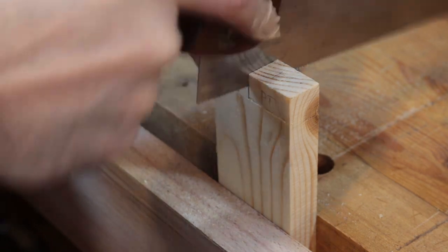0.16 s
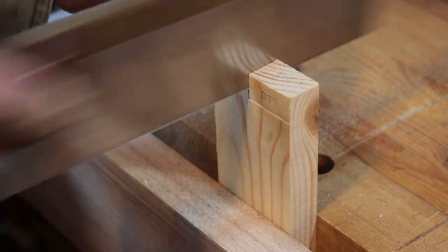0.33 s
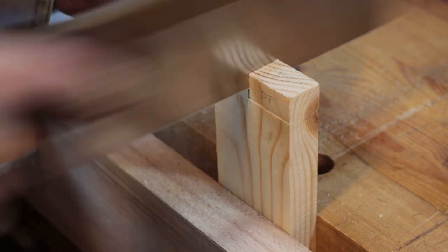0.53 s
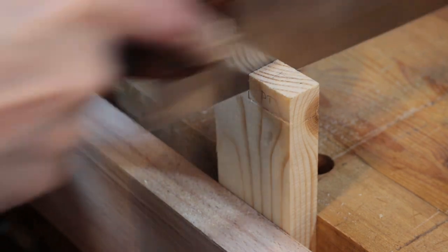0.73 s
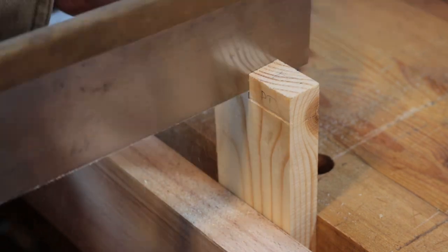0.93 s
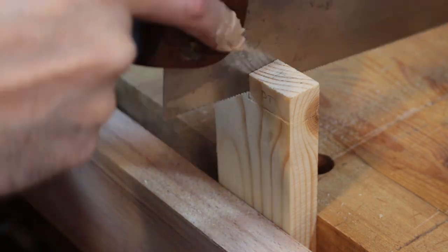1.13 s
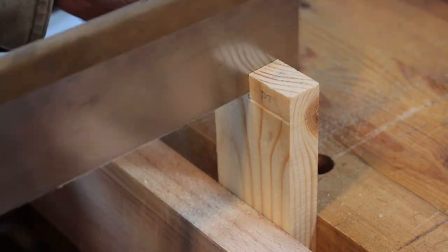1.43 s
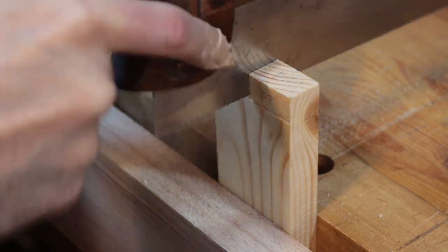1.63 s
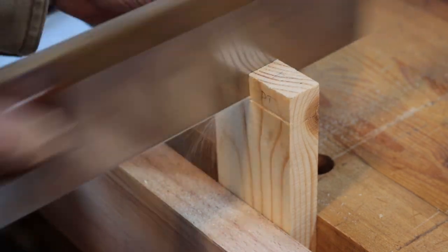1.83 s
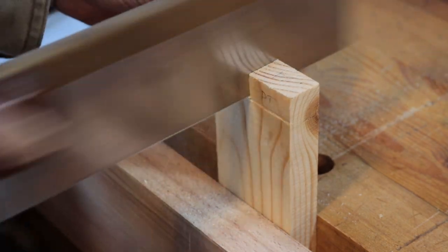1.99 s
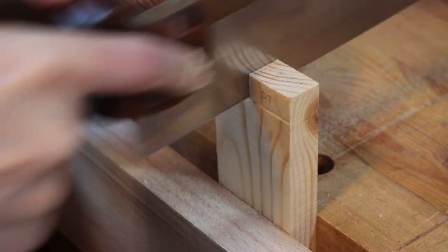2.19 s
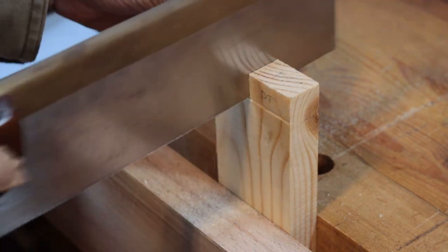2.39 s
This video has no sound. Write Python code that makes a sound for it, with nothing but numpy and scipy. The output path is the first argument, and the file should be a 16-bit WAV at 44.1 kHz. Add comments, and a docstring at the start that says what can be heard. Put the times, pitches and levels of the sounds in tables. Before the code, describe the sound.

Brisk wood sawing, hard honking push strokes alternating with softer scratchy pulls, close in a small workshop.

```python
"""A close stereo pair in a small workshop: a backsaw in a pine board held in a bench vise, two and a half seconds.
Over quiet room air a dragging pull is under way; a push bites hard, and the two alternate, about four strokes a second.
From the start the teeth knock the board in a half-regular train, fibres tear, grit rasps through the steel blade,
short notes of locked teeth come and go, and the bench rumbles and thuds. From a third of a second in, teeth also snag
now and then with blunt knocks. The room answers throughout, and a last push is biting at the end."""
import sys
import numpy as np
from scipy import signal
from scipy.fft import rfft, irfft, next_fast_len
from scipy.io import wavfile
from scipy.ndimage import uniform_filter1d, map_coordinates

SR = 44100
rng = np.random.default_rng(int(sys.argv[2]) if len(sys.argv) > 2 else 0)


def level_to_linear(level):
    """Convert decibel levels to linear amplitude factors, elementwise."""
    exponent = np.asarray(level, float) / 20
    return 10 ** exponent


def wrap_up_sound(samples):
    """Save the sound to the file named by the first command line argument, as 16-bit audio."""
    columns = np.atleast_2d(samples).T
    # keep every value between -1 and 1, then stretch to whole-number steps
    tamed = np.clip(columns, -1, 1)
    steps = np.round(tamed * 32767).astype(np.int16)
    wavfile.write(sys.argv[1], SR, steps)


N = 112454  # samples, about 2.55 s

# resonances of the board in the vise: (frequency [Hz], width [Hz], relative level [dB])
BOARD_MODES = [(201, 35, -11), (270, 23, -2), (314.6, 26.4, -3.5), (437, 32.6, -1.5), (472.6, 41, -4),
               (548.3, 47.4, -3.5), (696.5, 40, -12.5), (774.6, 105, -5.5), (821.7, 50.5, -1.5),
               (888, 35, 2.5), (935, 31.3, -1), (1007, 50, -6.5), (1067.6, 38.5, -5.5), (1134, 40, -10.5),
               (1212, 30, -8.5), (1386, 215, -17.5), (740, 324, -12.5)]
PATCHY_DB = 2  # rms depth of the drifting patches in tearing and grit


def unit(x):
    """Scaled to rms 1."""
    return x / np.sqrt(np.mean(x ** 2) + 1e-20)


def along(points, hz):
    """(Hz, value) points read on a log frequency axis."""
    f, v = np.transpose(points)
    return np.interp(np.log(hz + 1), np.log(f + 1), v)


def filtered(x, response):
    """x times a complex response of frequency."""
    size = next_fast_len(N + SR // 2)  # spare half second for the ringing
    spectrum = rfft(x, size) * response(np.fft.rfftfreq(size, 1 / SR))
    return irfft(spectrum, size)[..., :N]


def modes(table, sign=-1):
    """Causal response of a set of resonances; sign 1 starts them all in step, -1 in alternation."""
    def response(f):
        return sum(sign ** k * level_to_linear(db) * 1j * f * width / (centre * centre - f * f + 1j * f * width)
                   for k, (centre, width, db) in enumerate(table))
    return response


def wobble(rate):
    """A smooth random curve, rate knots a second."""
    knots = rng.standard_normal(size=400)
    return map_coordinates(knots, [np.arange(N) * rate / SR], mode="mirror")


def grains(per_s, spread_db):
    """Random impulses of uneven size, rms 1."""
    chance, size, sign = rng.random(N), rng.exponential(size=N), rng.standard_normal(N)
    return unit((chance < per_s / SR) * level_to_linear(spread_db * size) * sign)


def patchy(x, depth_db):
    """x with drifting patches of random gain over time and frequency, rms 1."""
    z = signal.stft(x, nperseg=512)[2]
    field = uniform_filter1d(rng.standard_normal(z.shape), 4, 0)
    field = uniform_filter1d(field, 6, 1)
    return unit(signal.istft(z * level_to_linear(depth_db * unit(field)), nperseg=512)[1][:N])


def spread(pair):
    """Two unrelated signals as mid and side: near mono in the bass, wide in the treble."""
    # width of the room sound: (frequency [Hz], side over mid [dB])
    room_width = [(25, -19), (60, -22), (250, -15.5), (700, -6.5), (3000, -1), (6000, 2.5), (15000, 0)]
    side = filtered(pair[1], lambda f: level_to_linear(along(room_width, f)))
    return np.array([pair[0] + side, pair[0] - side])


def air():
    """The quiet of the workshop: steady coloured noise, spread over the two ports."""
    # colour of the air noise: (frequency [Hz], relative level [dB])
    air_colour = [(12, -51), (20, -16), (118, -21), (286, 0), (733, -3), (865, -15), (1460, -33),
                  (4200, -18), (15000, -73)]
    noise = filtered(rng.standard_normal((2, N)), lambda f: level_to_linear(along(air_colour, f)))
    return level_to_linear(-51) * spread(unit(noise))


def shop(x):
    """The room's answer: a noise tail in which each frequency dies at its own speed."""
    # decay of the workshop: (frequency [Hz], time to fall 60 dB [s])
    shop_decay = [(200, 0.21), (2000, 0.17), (10000, 0.11)]
    hz, t, z = signal.stft(rng.standard_normal((2, SR // 2)), SR, nperseg=256)
    fade = level_to_linear(-60 * t / along(shop_decay, hz)[:, None])
    tail = signal.istft(z * fade, SR, nperseg=256)[1]
    tail = tail / np.linalg.norm(tail[0])
    late = np.pad(x, (200, 0))[None]  # the answer arrives 200 samples after the direct sound
    return spread(signal.fftconvolve(late, tail, axes=1)[:, :N])


def hand():
    """The sawing hand's force, rasp and hardness per sample, drawn as straight lines between points."""
    # the hand: (time [s], force on the board [dB], rasp over force [dB], hardness of the bite [dB])
    hand_points = [(0.0, -18, -2.5, -10), (0.02, -25, -13.5, -2.5), (0.07, -25, -11.5, -4.5),
                   (0.12, -18, -4.5, -15), (0.14, -21.5, -3.5, -2), (0.2, -10.5, -6.5, 5),
                   (0.23, -12, -17, 5.5), (0.31, -33.5, -9.5, -10), (0.35, -19, -5, 3.5),
                   (0.36, -25.5, -5.5, -3), (0.45, -21.5, -4, -0.5), (0.49, -23, -7.5, -4.5),
                   (0.57, -29, -14.5, -5), (0.6, -20, -7, -2), (0.62, -25.5, -1.5, -7),
                   (0.64, -15, -2.5, -1.5), (0.72, -12.5, -13.5, 6.5), (0.8, -36.5, -14, -12),
                   (0.83, -23.5, -9.5, -1), (0.96, -25, -6, 2.5), (1.07, -32, -13, -7),
                   (1.12, -19, -7, 1.5), (1.16, -18.5, -3, 0.5), (1.21, -12, -13, 3),
                   (1.3, -34, -14.5, -15), (1.33, -18.5, -13, -1.5), (1.39, -24, -6, 1),
                   (1.42, -17.5, -11, 0), (1.46, -22, -9, -7), (1.55, -31.5, -18.5, -9),
                   (1.57, -24.5, -9, 3), (1.6, -16, -13, -4.5), (1.67, -16, -3, 8.5), (1.69, -12, -12, 0),
                   (1.79, -34.5, -10.5, -4), (1.85, -25, -11, -6.5), (1.91, -28.5, -7, -1),
                   (1.99, -23, -13.5, -6), (2.05, -36, -12, -4.5), (2.09, -23, -7, -3),
                   (2.11, -19, -11, -7.5), (2.18, -19, -2.5, -8.5), (2.19, -15, -8, 1.5),
                   (2.23, -17.5, -14.5, -3.5), (2.3, -39.5, -9, -19), (2.31, -35, -3, 21),
                   (2.33, -20.5, -13.5, -10), (2.36, -22, -8.5, 2), (2.38, -20.5, -10.5, -7.5),
                   (2.42, -24.5, -3.5, 0.5), (2.45, -20, -17, -2.5), (2.52, -37, -4.5, -6),
                   (2.55, -12.5, -11, 4)]
    s, *columns = np.transpose(hand_points)
    return [np.interp(np.arange(N) / SR, s, column) for column in columns]


def bench():
    """The heavy bench rumbles with the force and gives decaying low thuds as it takes the thrust."""
    # thuds: (time [s], level [dB])
    thuds = [(.08, -39), (.33, -48), (0.558, -43), (.69, -37.5), (1.202, -38), (1.579, -48), (1.708, -45),
             (2.53, -41)]
    # colour of the rumble: (frequency [Hz], relative level [dB])
    rumble_colour = [(25, -13), (55, -9), (78, -3), (105, -9), (150, -2), (250, -4.5), (500, -37)]
    thud_hz, t60_s, attack_s = 77, .3, .025
    rumble_db, follows = -40.5, 0.25  # level at 0 dB force; dB of rumble for each dB of force
    out, t = np.zeros(N + SR), np.arange(SR // 2) / SR
    envelope = level_to_linear(-60 * t / t60_s) * (1 - np.exp(-t / attack_s))
    ring = envelope * np.sin(2 * np.pi * thud_hz * t)
    for s, db in thuds:
        out[round(s * SR):][:len(t)] += level_to_linear(db + 7.5) * ring  # makes up for the slow attack
    rumble = unit(filtered(rng.standard_normal(N), lambda f: level_to_linear(along(rumble_colour, f))))
    force_db = uniform_filter1d(hand()[0], 1500)
    return out[:N] + level_to_linear(rumble_db + follows * force_db) * rumble


def snags():
    """A tooth snags on a hard fibre: single blunt knocks that start all the board's resonances in step."""
    # snags: (time [s], level before trim [dB])
    snag_hits = [(0.356, -10.5), (0.58, -13), (0.668, -6), (0.697, -3.5), (0.714, -4.5), (1.652, -5),
                 (1.684, 0), (1.701, -1.5), (1.808, -15), (2.21, -7), (2.334, -10.5)]
    high_hz, low_hz, trim_db = 1320, 413, -2  # the knock is rolled off above and below

    def knock(f):
        blunt = 1 / (1 + 1j * f / high_hz) ** 2
        thin = (f / (f - 1j * low_hz)) ** 2
        return modes(BOARD_MODES, sign=1)(f) * blunt * thin

    peak = np.abs(filtered(signal.unit_impulse(N), knock)).max()
    blows = np.zeros(N)
    for s, db in snag_hits:
        blows[round(s * SR)] = level_to_linear(db + trim_db) / peak
    return filtered(blows, knock)


def chatter():
    """Spells in which the teeth lock onto one note: a wavering, gliding sine that swells and fades."""
    # spells: (time [s], length [s], from [Hz], to [Hz], level before flutter [dB])
    spells = [(0.063, .09, 270, 268, -21.5), (0.149, 0.068, 815, 847, -18.5),
              (0.335, 0.059, 850, 901, -16.5), (0.377, 0.078, 920, 978, -20.5),
              (0.362, 0.21, 190, 191.5, -30), (0.621, 0.052, 845, 825, -18.5),
              (0.891, 0.099, 437, 438.5, -21), (0.911, 0.084, 935, 926, -25.5),
              (0.939, .12, 190, 189.5, -33.5), (1.32, 0.18, 186.3, 177.3, -34.5),
              (1.898, 0.13, 149.7, 145, -34.5), (2.35, .14, 161.5, 148, -35.5),
              (1.402, .07, 930, 865, -17.5), (1.82, .07, 300, 309.5, -27.5),
              (1.941, 0.094, 272, 266, -21.5), (2.14, 0.076, 545, 560.2, -18),
              (2.191, 0.075, 480, 430.1, -17), (2.323, 0.092, 880, 881.4, -22.5),
              (2.41, .06, 440, 438, -26.5)]
    waver_hz, flutter_db = 8, 2.5
    t, out = np.arange(N) / SR, np.zeros(N)
    for s, length, from_hz, to_hz, db in spells:
        progress = np.clip((t - s) / length, 0, 1)
        hz = from_hz + (to_hz - from_hz) * progress + waver_hz * wobble(60)
        swell = np.abs(np.sin(np.pi * progress)) ** 0.63
        level = level_to_linear(db + flutter_db * wobble(70))
        out += swell * level * np.sin(2 * np.pi * np.cumsum(hz) / SR)
    return out


def blade():
    """Dense grit at the teeth: a broad rasp that also rings the resonances of the steel plate."""
    # resonances of the saw blade: (frequency [Hz], width [Hz], relative level [dB])
    plate_modes = [(1567, 31, -5.5), (1752, 52, 7.5), (1970, 20, 1), (2313, 64, 6.5), (2555, 35, -2.5),
                   (2794, 53, 7), (3250, 68, -8), (4070, 37, -4), (4210, 120, 5), (4346, 137, 7.5),
                   (4413, 137, 4.5), (4686, 52, 3.5)]
    # colour of the rasp: (frequency [Hz], relative level [dB])
    rasp_colour = [(590, -32.5), (1000, -2), (1360, -8.5), (2330, -9), (3630, -18), (4310, -17.5),
                   (5300, -23.5), (7540, -28.5), (8950, -43.5), (10200, -40), (11800, -42.5), (14000, -46),
                   (15400, -64)]
    grit_db, plate_db = -2.5, 2  # level of the rasp; how strongly the plate rings in it
    sizzle_hz, sizzle_grows = 4000, 0.26  # the top swings wider: extra dB for each dB of rasp

    def colour(f):
        return level_to_linear(along(rasp_colour, f)) * (1 + level_to_linear(plate_db) * modes(plate_modes)(f))

    force_db, rasp_db, _ = hand()
    level_db = force_db + rasp_db + grit_db
    grit = patchy(grains(6000, 1.8), PATCHY_DB)
    top = filtered(grit, lambda f: 1 - 1 / (1 + (f / sizzle_hz) ** 4))
    grit = grit - top + top * level_to_linear(sizzle_grows * (level_db - level_db.mean()))
    scale = np.std(filtered(grit, colour))
    return filtered(level_to_linear(level_db) * grit, colour) / scale


def teeth():
    """Teeth pass the cut at a rate that follows each stroke's speed; returns their train and share of force."""
    # strokes: (start [s], end [s], fastest moment [s], rate then, before wander [Hz], regular share [0-1])
    # a fastest moment beyond the end means the stroke is still speeding up when it ends
    strokes = [(-.18, 0.069, 0.05, 451.6, 0.2), (0.071, 0.309, 0.14, 848.3, 0.29),
               (0.309, .56, 0.82, 489.9, 0.37), (0.562, .8, 0.92, 838.5, 0.3),
               (0.799, 1.06, 1.28, 448.1, 0.42), (1.06, 1.299, 1.48, 803.8, 0.46),
               (1.3, 1.539, 1.66, 455.7, 0.32), (1.542, 1.789, 2.19, 881.9, 0.39),
               (1.789, 2.06, 1.78, 310, 0.37), (2.061, 2.3, 2, 549.3, 0.33), (2.301, 2.511, 3, 443.6, 0.35),
               (2.508, 2.748, 4.5, 853, 1)]
    speed_shape, rate_wander = .4, .03  # exponent on the speed arc; share of the rate
    jitter, tooth_db = .12, 3  # timing scatter in tooth periods; level scatter in dB
    t, rate, share = np.arange(N) / SR, np.zeros(N), np.zeros(N)
    for start, end, fastest, top_hz, regular in strokes:
        arc = np.sin(np.pi * np.interp(t, [start, fastest, end], [0, .5, 1]))
        on = (t >= start) & (t < end)
        rate[on] = (top_hz * np.abs(arc) ** speed_shape)[on]
        share[on] = np.clip(regular, 0, 1)
    rate = np.maximum(rate, 60) * (1 + rate_wander * wobble(30))
    at = np.flatnonzero(np.diff(np.floor(np.cumsum(rate) / SR)))  # one tooth per whole cycle
    draw = rng.standard_normal((N // 20, 2))[:len(at)]
    shift = (jitter * draw[:, 0] * SR / rate[at]).astype(int)
    at = np.clip(at + shift, 0, N - 1)
    size = level_to_linear(tooth_db * draw[:, 1]) / np.sqrt(rate[at] / SR)  # even power at any rate
    train = np.bincount(at, size, N)
    return train - uniform_filter1d(train, 800), uniform_filter1d(share, 400)


def board():
    """Teeth and tearing fibres push the board into resonance; a hard bite reaches its upper modes."""
    hard_hz, board_db = 580, -2  # where soft and hard push part; how strongly the board answers
    force_db, _, hard_db = hand()
    train, share = teeth()
    tearing = patchy(grains(3500, 1.5), PATCHY_DB)
    push = np.sqrt(share) * train + np.sqrt(1 - share) * tearing
    soft = filtered(push, lambda f: 1 / (1 + (f / hard_hz) ** 6))
    push = soft * level_to_linear(-hard_db / 2) + (push - soft) * level_to_linear(hard_db / 2)
    scale = np.std(filtered(push, modes(BOARD_MODES)))
    return filtered(level_to_linear(force_db + board_db) * push, modes(BOARD_MODES)) / scale


def ports(saw):
    """Direct sound at the two close ports: level and phase differ with frequency, half taken on each side."""
    # level between the ports: (frequency [Hz], left over right [dB])
    left_level = [(200, 0), (380, -.5), (700, -1.8), (1280, -2.6), (2370, -4), (4370, -.5), (8050, 0)]
    # phase between the ports: (frequency [Hz], lead of the left [rad])
    left_lead = [(200, 0), (860, 0.37), (2300, .5), (3500, 0.84), (4500, 1.68), (6000, 2), (9000, 2.6),
                 (15000, 2.5)]

    def both(f):
        half = level_to_linear(along(left_level, f) / 2) * np.exp(.5j * along(left_lead, f))
        return np.array([half, 1 / half])

    return filtered(saw, both)


def scene():
    """The saw stands a little to one side of the two ports; the room's answer and the air surround it."""
    # room sound: (frequency [Hz], room over direct [dB])
    room_level = [(200, -9), (1000, -6), (2500, -4), (4000, -2), (12000, -4)]
    saw = board() + chatter() + snags() + blade() + bench()
    wet = shop(filtered(saw, lambda f: level_to_linear(along(room_level, f))))
    return ports(saw) + wet + air()


def roll_off(x):
    """The treble ends steeply here."""
    return signal.sosfilt(signal.butter(12, 15460, fs=SR, output="sos"), x)


def record(dry):
    """A soft limiter rounds off peaks near full scale."""
    ceiling, knee = .97, 6  # share of full scale; higher knee bends later
    mix = dry / (1 + np.abs(dry / ceiling) ** knee) ** (1 / knee)
    return roll_off(mix)


dry = scene()
out = record(dry)
wrap_up_sound(out)
```